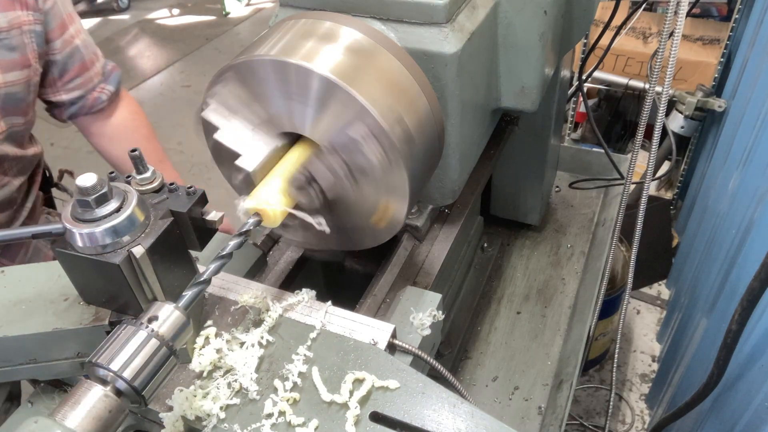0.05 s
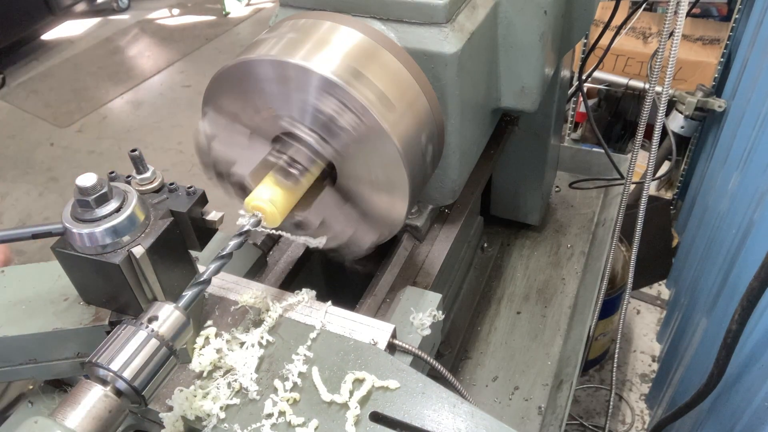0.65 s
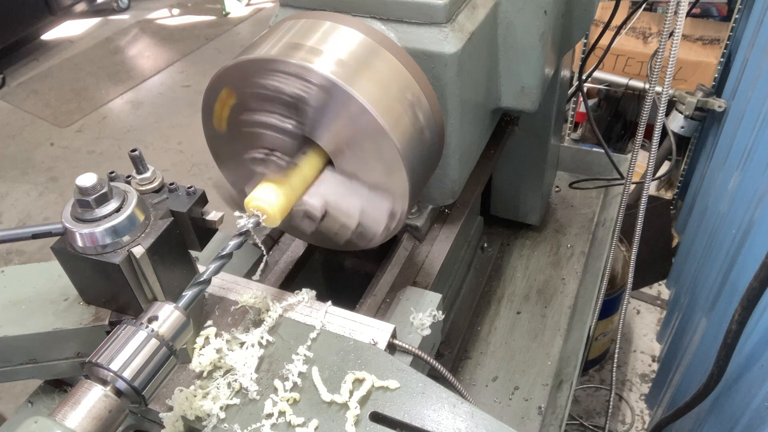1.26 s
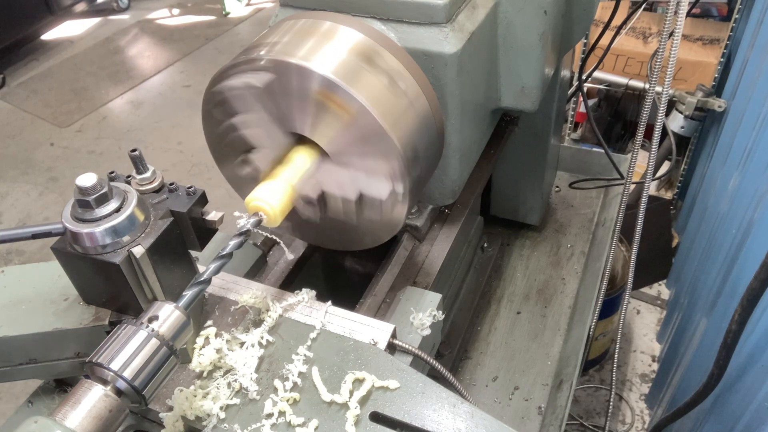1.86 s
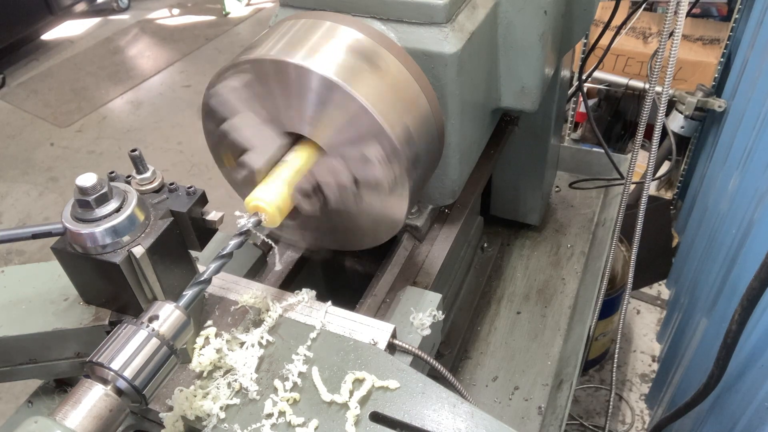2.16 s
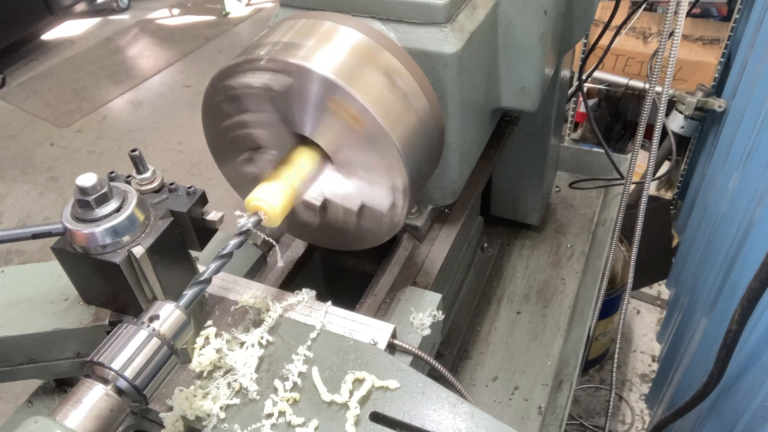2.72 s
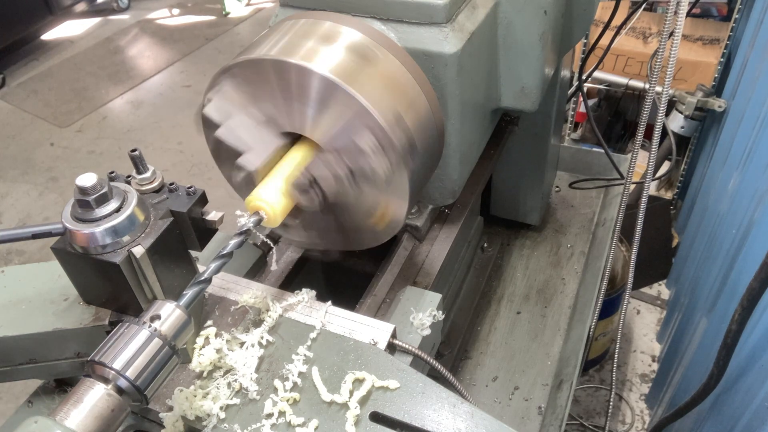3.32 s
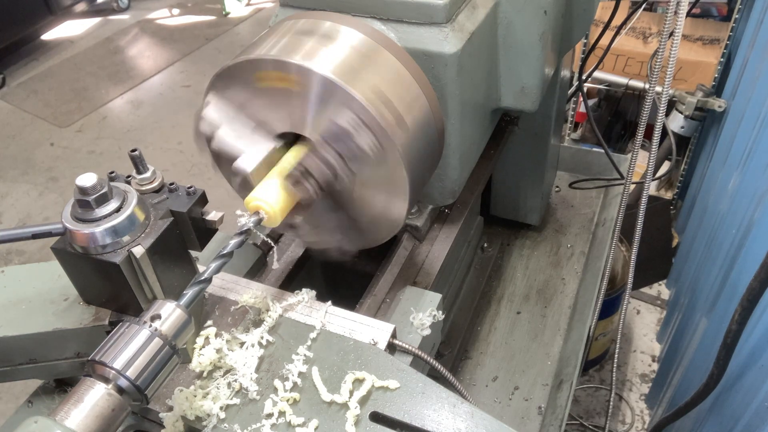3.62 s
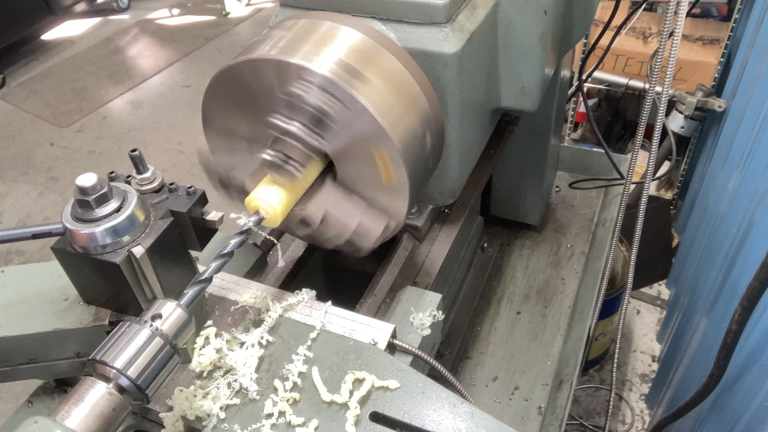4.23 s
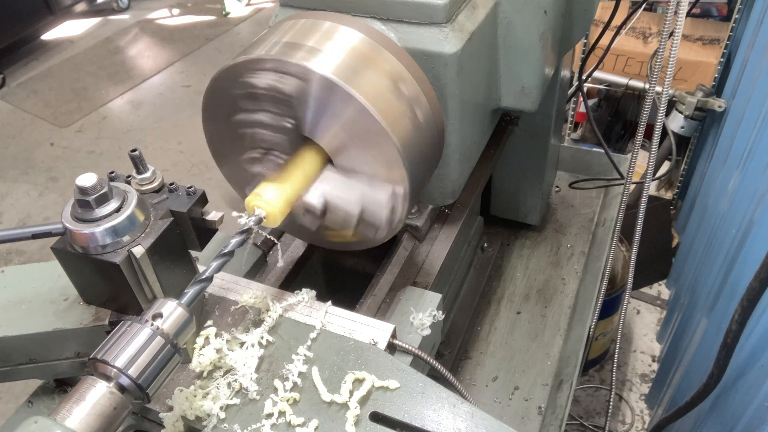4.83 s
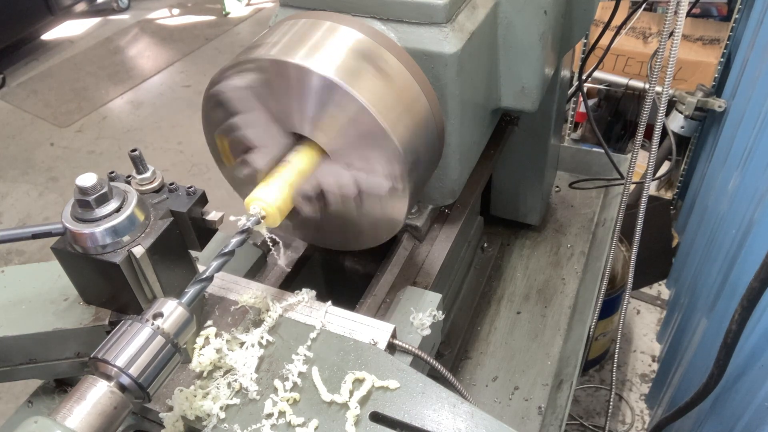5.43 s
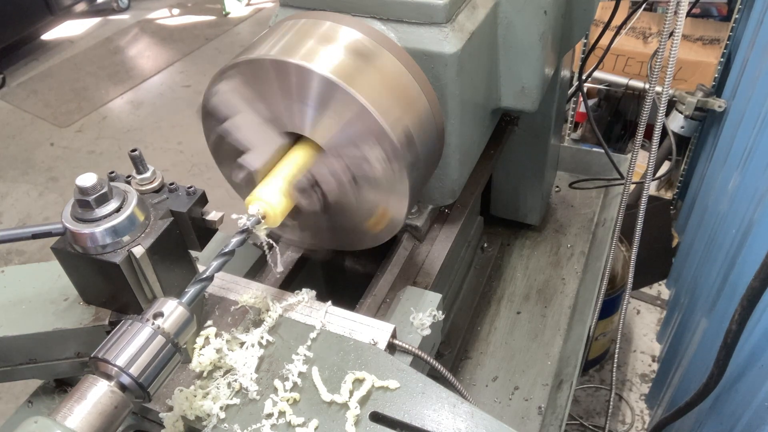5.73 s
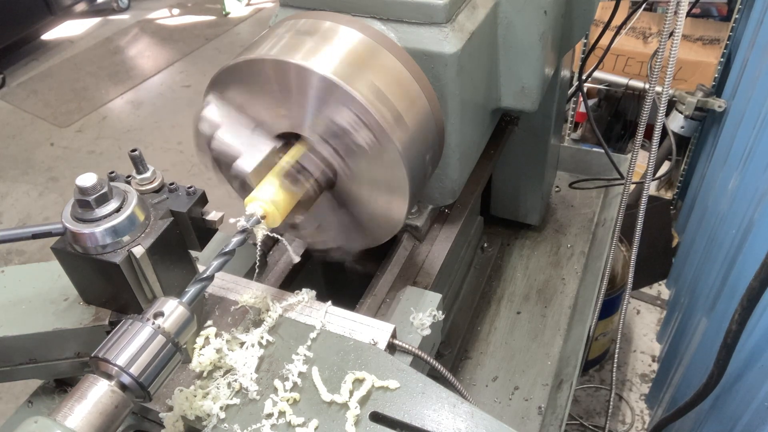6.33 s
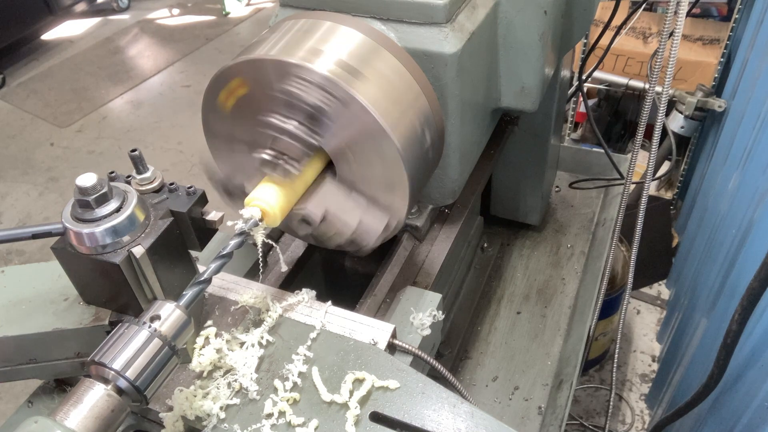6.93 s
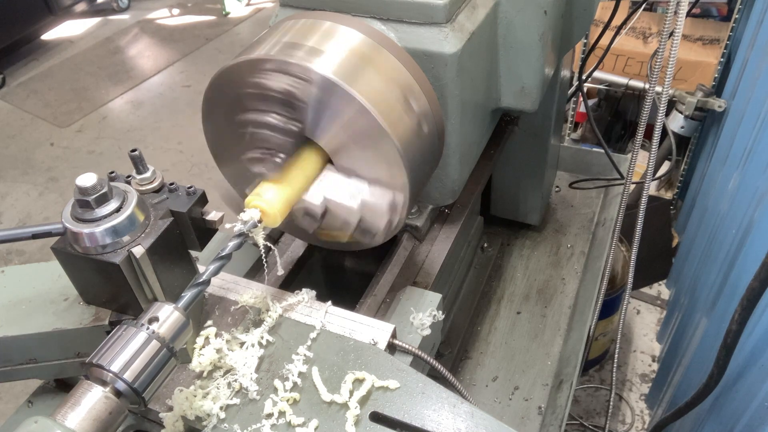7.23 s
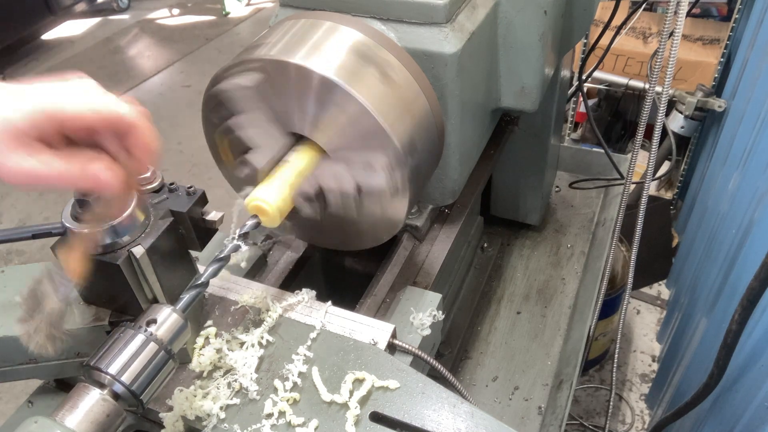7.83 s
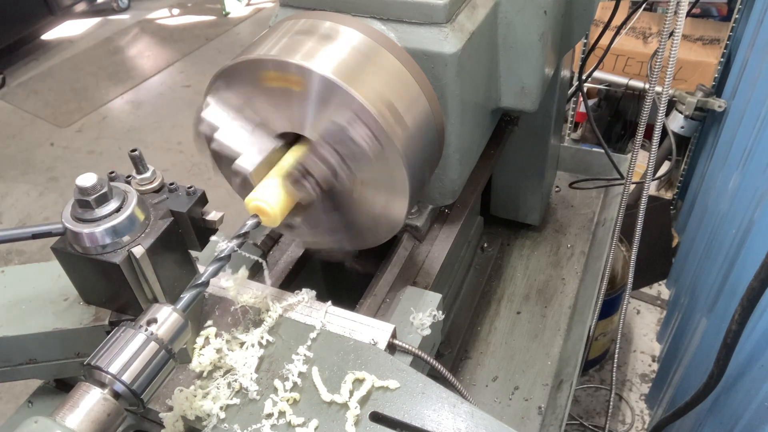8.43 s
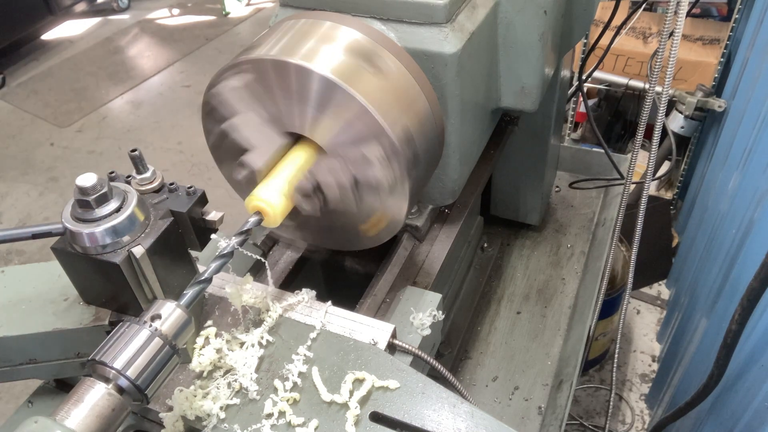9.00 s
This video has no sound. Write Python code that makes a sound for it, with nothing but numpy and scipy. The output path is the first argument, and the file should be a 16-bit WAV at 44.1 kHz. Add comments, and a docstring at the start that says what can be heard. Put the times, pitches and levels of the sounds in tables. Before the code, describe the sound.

A metal lathe runs steadily with a low, even hum and whirring gears while a drill rubs softly into spinning plastic.

```python
"""Drilling plastic on a metal lathe

A lathe runs steadily in a workshop while a twist drill bores the spinning plastic bar. The motor hums
at multiples of the mains frequency. Sliding gear teeth whir and excite the headstock's resonances,
swelling once in each turn of the slow wheel, while a shaft turning four times as fast alternates
bright rings. Friction at the drill hisses softly, and the swarf scrapes now and then."""
import sys
import numpy as np
from scipy import signal
from scipy.fft import rfft, irfft
from scipy.io import wavfile
from scipy.ndimage import uniform_filter1d

SR = 44100
rng = np.random.default_rng(int(sys.argv[2]) if len(sys.argv) > 2 else 0)


def transcribe(signal):
    """Save signal, clipped to [-1, 1], as a 16-bit WAV file at the path in sys.argv[1]."""
    frames = np.atleast_2d(signal).T
    limited = np.clip(frames, -1, 1)
    pcm = np.round(limited * 32767).astype(np.int16)
    wavfile.write(sys.argv[1], SR, pcm)


N = 403956
T = np.arange(N) / SR
FREQ = np.fft.rfftfreq(N, 1 / SR)
WHEEL_HZ = 2.286  # rotation rate of the slow wheel


def gain_of(db):
    """Amplitude ratio of a level in decibels."""
    return 10 ** (np.asarray(db) / 20)


def unit_rms(x):
    """Normalisation to a mean power of 1."""
    return x / np.sqrt(np.mean(abs(x) ** 2) + 1e-20)


def over_pitch(rows):
    """Interpolation of (frequency_hz, value) rows on a logarithmic frequency axis."""
    hz, value = np.transpose(rows)
    return np.interp(np.log(FREQ + 1), np.log(hz + 1), value)


def drift(rate_hz):
    """Random modulation of rms 1, linear between values drawn at the given rate."""
    knots = rng.standard_normal(6000)
    return unit_rms(np.interp(T * rate_hz, np.arange(len(knots)), knots))


def hump(offset, width):
    """Gaussian pulse of height 1 around offset 0."""
    return np.exp(-(offset / width) ** 2)


def accents(rows, half_length_s=0.13):
    """Level modulation in dB for the turns that stand out."""
    return sum(db * hump(T - crest_s, half_length_s) for crest_s, db in rows)


def tone(cycles, db, phase):
    """A sinusoid of given rms level with an interaural phase difference."""
    return np.sqrt(2) * gain_of(db) * np.sin(2 * np.pi * (cycles + rng.random()) - np.array([[0], [phase]]))


def stereo_noise(spectrum):
    """Partially coherent noise: the ratio of mid to side power sets how alike the ears are."""
    # interaural coherence: frequency_hz, coherence
    likeness = [(60, 0.63), (150, 1), (330, 0.91), (450, 0.7), (630, 0.077), (1240, 0.66), (1800, -0.29),
                (3400, 0.6), (4700, -0.28)]
    coherence = over_pitch(likeness)
    mid, side = rfft(rng.standard_normal((2, N))) * np.sqrt([1 + coherence, 1 - coherence])
    return unit_rms(irfft(np.array([mid + side, mid - side]) * gain_of(over_pitch(spectrum)), N))


def resonate(force, hz, width_hz, phase, wander_hz=0):
    """Forced resonance: friction noise drives a double pole, heard with an interaural phase difference."""
    pole = np.exp((-np.pi * width_hz + 2j * np.pi * hz) / SR)
    ring = signal.lfilter([1], [1, -2 * pole, pole ** 2], force * rng.standard_normal(len(force)))
    if wander_hz:
        ring = ring * np.exp(2j * np.pi * np.cumsum(wander_hz * drift(30)[:len(force)]) / SR)
    return np.array([ring.real, (ring * np.exp(-1j * phase)).real])


def sustained(ring, force, firmness=0.45, span_s=0.029):
    """Steady contact feeds a resonance, drawing its envelope towards that of the driving force."""
    window = int(span_s * SR) + 1
    force_level, ring_level = (unit_rms(np.sqrt(abs(uniform_filter1d(power, window))))
                               for power in (force ** 2, (ring ** 2).mean(0)))
    return unit_rms(ring * ((force_level + 0.01) / (ring_level + 0.01)) ** firmness)


def tooth_ripple(count, depth_db):
    """Amplitude modulation at the meshing frequency: tooth count times the wheel's rotation rate."""
    return gain_of(depth_db * np.cos(2 * np.pi * count * WHEEL_HZ * T))


def wheel_load(swing_db, crest_turns, slack_db, slack_turns=0.28):
    """Eccentricity: the wheel's load in dB swings once a turn and dips where the teeth go slack."""
    turns = T * WHEEL_HZ
    slack = hump((turns - slack_turns + 0.5) % 1 - 0.5, width=0.11)
    load_db = swing_db * np.cos(2 * np.pi * (turns - crest_turns)) + slack_db * slack
    return load_db - load_db.mean()


def workshop(x, wet=0.5, t60_s=0.16, echoes_per_s=2000):
    """Reverberation: reflections from bed, wall and floor decay exponentially, different at each ear."""
    age = np.arange(SR // 5) / SR
    shape = (2, len(age))
    echoes = rng.standard_normal(shape) * (rng.random(shape) < echoes_per_s / SR) * (age > 0.002)
    echoes *= np.exp(-np.log(1000) * age / t60_s)
    echoes /= np.linalg.norm(echoes, axis=1, keepdims=True)
    return (x + wet * signal.oaconvolve(x, echoes, axes=1)[:, :N]) / np.hypot(1, wet)


def from_chuck(force, spectrum, left_lag_s=0.000249):
    """Direct and diffuse fields: friction noise reaches the left ear late, amid scattered sound."""
    # direct part of the sound: frequency_hz, power_share
    direct_shares = [(5500, .15), (7000, 0.57), (8200, 0.92), (12000, 1)]
    share = over_pitch(direct_shares)
    friction = rfft(force * rng.standard_normal((3, N))) * unit_rms(gain_of(over_pitch(spectrum)))
    delay = np.exp(-2j * np.pi * FREQ * np.array([[left_lag_s], [0]]))
    direct = np.sqrt(share) * delay * friction[0]
    diffuse = np.sqrt(1 - share) * friction[1:]
    return irfft(direct + diffuse, N)


def hiss(level_db=-53.5, flicker_db=1.9, ceiling_db=1.0):
    """Amplitude-modulated noise: the machine's fine hiss dips irregularly as three flutters combine."""
    # hiss spectrum: frequency_hz, relative_db
    spectrum = [(2500, -11), (5000, 8), (7000, 8), (8000, 1.5), (9300, 3), (10500, -4.5), (12500, -10.5),
                (15500, -28.5)]
    # periodic flutters: rate_hz, relative_depth, crest_s
    flutters = [(11.2, 1.1, .072), (13.06, 1.2, .042), (16.98, 1.3, .057)]
    flutter_db = 1.5 * sum(depth * np.cos(2 * np.pi * hz * (T - crest_s)) for hz, depth, crest_s in flutters)
    force = gain_of(level_db + np.minimum(flutter_db, ceiling_db) + flicker_db * drift(40))
    return from_chuck(force, spectrum)


def thin_ring(level_db=-63, swell_db=3):
    """A narrow, very high metallic resonance comes and goes as its excitation varies."""
    force = gain_of(swell_db * drift(24))
    return gain_of(level_db) * unit_rms(resonate(force, hz=9845, width_hz=90, phase=3.05))


def stand(pitch_hz=160, wander_hz=3, rest_db=-40, uneven_db=3, swell_s=0.032):
    """One loose low resonance of the stand drones unevenly and now and then swells."""
    # brief swells of the drone: crest_s, level_db
    swells = [(.63, -28.5), (2.37, -29), (3.78, -28), (4.8, -28), (5.08, -27), (6.53, -26), (7.02, -24.5),
              (8.45, -30)]
    cycles = np.cumsum(pitch_hz + wander_hz * drift(20)) / SR
    level = gain_of(rest_db + uneven_db * drift(14))
    for crest_s, db in swells:
        level += (gain_of(db) - level) * hump(T - crest_s, swell_s)
    return np.sqrt(2) * level * np.sin(2 * np.pi * cycles)


def knocks():
    """Transients: each is friction noise in one resonance, rising fast and decaying exponentially."""
    # ticks and dull knocks: start_s, level_db, pitch_hz, width_hz, decay_s
    events = [(.005, -27.5, 282, 160, 0.039), (.468, -40, 3100, 1300, .003),
              (3.953, -36.5, 790, 520, 0.005), (6.748, -37, 2660, 1200, .0022)]
    out = np.zeros((2, N))
    age = np.arange(SR // 3) / SR
    for start_s, db, hz, width_hz, decay_s in events:
        ring = unit_rms(resonate(np.ones(len(age)), hz, width_hz, phase=0.37))
        envelope = age / decay_s * np.exp(1 - age / decay_s)
        start = round(start_s * SR)
        out[:, start:start + len(age)] += gain_of(db) * envelope * ring
    return out


def whines(waver_db=1.3, wander_hz=0.7):
    """Two narrowband tones of the drive waver; the upper leads at first, then the lower takes over."""
    # thin whines: pitch_hz, ear_phase_rad, points of (time_s, level_db)
    partials = [(1045, 1.3, [(0, -65), (1.85, -63), (2.0, -52.5), (3.2, -55), (3.9, -52.5), (6, -52),
                (9.1, -51)]), (1104, 1.2, [(0, -57), (1.55, -55), (1.75, -48), (1.93, -47), (2.05, -56),
                (5.7, -58), (6.05, -55), (9.1, -57)])]
    out = np.zeros((2, N))
    for hz, phase, points in partials:
        cycles = np.cumsum(hz + wander_hz * drift(14)) / SR
        level_db = np.interp(T, *np.transpose(points)) + waver_db * drift(9)
        out += tone(cycles, level_db, phase)
    return out


def drill(contact_s=1.05, idle_db=-63, attack_s=0.2, build_db=4, release_s=0.054):
    """Friction noise of drill on plastic: light rubbing, bites and swarf scrapes add in power."""
    # the drill bites harder: start_s, length_s, full_level_db
    bites = [(1.147, 0.1, -52), (1.75, 0.65, -63), (4.36, 1.93, -54.5), (7.65, 0.15, -53)]
    # swarf scrapes past the drill: crest_s, half_length_s, level_db
    scrapes = [(5.477, .002, -46.5), (5.493, .018, -48), (6.1, .018, -53), (6.2, .018, -51),
               (6.238, .009, -38.5), (6.268, .014, -48), (6.294, .007, -46.5), (6.306, .002, -46)]
    # spectrum of rubbing plastic: frequency_hz, relative_db
    spectrum = [(4000, -19), (6500, -4.5), (7500, -3), (8700, 3), (10200, -3), (12000, -3.5), (13000, -5.5),
                (14200, -13.5), (15500, -10.5)]
    rub_power = gain_of(idle_db) ** 2 * np.clip((T - contact_s) / attack_s, 0, 1)
    for start_s, length_s, db in bites:
        age = T - start_s
        grip = np.clip(age / attack_s, 0, 1) * np.exp(-np.maximum(age - length_s, 0) / release_s)
        bite_db = db - build_db * np.clip(1 - age / length_s, 0, 1)
        rub_power += (grip * gain_of(bite_db)) ** 2
    grain = unit_rms(gain_of(2.2 * drift(300) + 0.8 * drift(25)))  # fine scratches in slower clumps
    scrape_power = sum((gain_of(db) * hump(T - crest_s, half_s)) ** 2 for crest_s, half_s, db in scrapes)
    return from_chuck(np.sqrt(rub_power * grain ** 2 + scrape_power), spectrum)


def mesh(slack_db=-5.5, waver_db=3):
    """Load modulation: the teeth sing with a restless pitch and fall away as they go slack."""
    # mesh tones: pitch_hz, wander_hz, level_db, swing_db, crest_turns, ear_phase_rad
    partials = [(965, 7, -52, 4, .88, 1.5), (1230, 12, -54.5, 3.5, .85, 1.8), (1399, 23, -50, 4, .78, .1)]
    # turns that sing more or less than usual: crest_s, extra_db
    odd_turns = [(.38, -3), (2.2, -1), (3.86, 1.5), (5.15, -1.5), (6.47, 3.5), (6.94, 2.5), (8.7, 1)]
    out = np.zeros((2, N))
    for hz, wander_hz, db, swing_db, crest_turns, phase in partials:
        cycles = np.cumsum(hz + wander_hz * drift(70)) / SR
        load_db = np.minimum(wheel_load(swing_db, crest_turns, slack_db), swing_db / 2)
        out += tone(cycles, db + accents(odd_turns) + load_db + waver_db * drift(30), phase)
    return out


def fast_shaft(uneven_db=1.14):
    """Friction excites resonances in alternation as the fast shaft rubs on one side, then the other."""
    # bright rings: pitch_hz, width_hz, level_db, swing_db, crest_turns, ear_phase_rad
    rings = [(4200, 72, -54, 4.8, 0.8, .4), (4355, 55, -53, 4.8, 0.69, 0.68),
             (4490, 300, -56, -1.5, 1, 0.93), (4638, 48, -53.5, 5.5, 0.18, 0.49),
             (4850, 60, -63, 4, 0.18, 1.1), (4980, 380, -61.5, 5, 0.18, 1.1)]
    # turns of harder rubbing: crest_s, extra_db
    hard_rubs = [(2.52, 2.5), (2.9, 2), (3.36, 3), (4.3, 2.5), (6.98, 2.5), (7.33, 3)]
    load_db = wheel_load(swing_db=0.5, crest_turns=0.64, slack_db=-7)
    force = gain_of(load_db + uneven_db * drift(20) + accents(hard_rubs))
    force *= tooth_ripple(60, depth_db=5) * tooth_ripple(120, depth_db=4)  # each tooth meets sharply
    shaft_turns = 4 * WHEEL_HZ * T
    out = np.zeros((2, N))
    for hz, width_hz, db, swing_db, crest_turns, phase in rings:
        rub = force * gain_of(swing_db * np.cos(2 * np.pi * (shaft_turns - crest_turns)))
        ring = resonate(rub, hz, width_hz, phase, wander_hz=14)
        out += gain_of(db) * sustained(ring, rub)
    return out


def gears(whir_db=-34.5, crossover_hz=400):
    """Sliding friction of the teeth radiates a broad whir and drives the modes of the headstock."""
    # whir spectrum: frequency_hz, relative_db
    spectrum = [(20, -34), (45, -19), (80, -3), (130, 3), (250, 0.5), (420, -4), (600, -6), (900, -11),
                (1600, -9.5), (2500, -14.5), (3700, -19), (4700, -21), (5400, -29), (7000, -59.5)]
    # modes of the casting: pitch_hz, width_hz, level_db, load_sensitivity, ear_phase_rad
    modes = [(88.4, 13, -41.5, 0, 0), (108.1, 5.8, -41.5, -1.5, 0.5), (280.5, 29, -38.5, -0.8, 0.5),
             (355, 40, -47.5, -2.5, 0.5), (496.6, 60, -51.5, -1.5, 1.1), (617, 45, -48.5, 1, 1.23),
             (676, 30, -48.5, 0.5, 1), (712, 16, -59, 0.5, 1.5), (771, 17, -53, -0.5, 2),
             (830, 15, -55.5, 4, 1), (872, 32, -57.5, 3.5, -0.6), (964, 55, -50, 1.5, 0.95),
             (1080, 72, -53, -2.5, 1.5), (1228, 73, -50, 0.7, 2), (1410, 110, -49.5, 2.5, 0),
             (1515, 100, -51, 0.5, 1.45), (1636, 79, -51, 0.3, 1.3), (1753, 89, -58.5, 3.5, 3),
             (1862, 59, -51.5, 3, 1.5), (2040, 35, -58, 1, 1), (2130, 78, -52.5, 4, 2.5),
             (2225, 55, -52.5, 3.5, 1), (2366, 60, -58.5, 2.5, 2), (2590, 270, -55, 1, 1.5),
             (2870, 86, -52.5, 3, 1.9), (3067, 71, -55, 1.5, 2), (3356, 210, -59.5, 3, 0.5),
             (3460, 170, -54, 2, 1.5), (3710, 120, -56.5, 0, 3.5), (3950, 240, -57.5, 2, 1.5)]
    load_db = wheel_load(swing_db=0.7, crest_turns=0.97, slack_db=-1.6)
    ripple = tooth_ripple(60, depth_db=1.5)
    whir = gain_of(whir_db + 0.7 * load_db) * stereo_noise(spectrum) * ripple
    bass = irfft(rfft(whir) / (1 + (FREQ / crossover_hz) ** 4), N)
    out = bass + workshop(whir - bass)  # the bass arrives directly, the rest with reflections
    mode_ripple = ripple * tooth_ripple(21, depth_db=1.54) * tooth_ripple(42, depth_db=1.54)
    for hz, width_hz, db, sensitivity, phase in modes:
        force = gain_of(sensitivity * load_db) * mode_ripple
        out += gain_of(db) * unit_rms(resonate(force, hz, width_hz, phase))
    return out


def mains_hum(mains_hz=59.942, weak_db=-2.5, settle_s=0.58, throb_db=-20.5, beat_hz=12.2):
    """Magnetic forces hum at mains harmonics; a fading tone just below the second beats against it."""
    # magnetic hum: harmonic_number, level_db
    harmonics = [(1, -50.5), (2, -16.5), (4, -50), (6, -37.5), (8, -50.5), (10, -64.5), (12, -62),
                 (14, -57.5)]
    cycles = mains_hz * T
    hum = sum(gain_of(db) * np.cos(2 * np.pi * number * cycles) for number, db in harmonics)
    hum *= gain_of(weak_db * np.exp(-T / settle_s))  # starts a little weak, then settles
    first_dip_s, hold_s, decay_s = 0.033, 0.1, 0.047
    fade = np.exp(-np.maximum(T - hold_s, 0) / decay_s)
    throb = gain_of(throb_db) * fade * np.cos(2 * np.pi * (2 * cycles - beat_hz * (T - first_dip_s)))
    return np.sqrt(2) * (hum - throb)


def motor(waver_db=1.15, waver_cycles=0.023):
    """Superposition: weaker shaft and gear tones beat against the steady mains hum."""
    # shaft and gear tones: pitch_hz, level_db, ear_phase_rad
    partials = [(53.5, -59.5, 0.099), (62.2, -54.5, 0.24), (77, -54.5, 0), (87.6, -47.5, 0.22),
                (88.5, -53, 0.079), (103, -40.5, 0.35), (107, -47.5, 0), (107.7, -47, 0.31),
                (111.2, -44.5, 0.039), (136, -49, 0), (150.3, -44, 0.027), (269.4, -49.5, 0),
                (344, -59.5, 0.12), (377, -50.5, 0.045), (393.3, -52.5, 0.16), (451, -57, 0.44),
                (489.3, -54.5, 0.68), (498, -54.5, 1), (511, -52.5, 1.1), (655, -58, 0.82),
                (832, -59, 0.94), (922, -60.5, 0.072)]
    out = np.ones((2, 1)) * mains_hum()
    for hz, db, phase in partials:
        unsteady = np.sqrt(hz / 300)  # uneven speed disturbs the high tones most
        cycles = hz * T + waver_cycles * unsteady * drift(5)
        out += tone(cycles, db + waver_db * unsteady * drift(6), phase)
    return out


def scene():
    """The sound pressures of all parts of the lathe add linearly."""
    machine = motor() + stand() + gears() + mesh() + whines() + fast_shaft() + hiss() + thin_ring()
    return machine + drill() + knocks()


def record(dry, cutoff_hz=15700):
    """An interaural level difference puts the bass to the right; a low-pass filter limits the band."""
    # balance between the ears: frequency_hz, left_minus_right_db
    balance = [(120, -1.92), (300, -0.6), (550, -3.0), (1200, 0.5), (2500, 1.7), (4500, -0.7), (8000, 0)]
    balance_db = over_pitch(balance)
    heard = irfft(rfft(dry) * gain_of(np.array([balance_db, -balance_db]) / 2), N)
    low_pass = signal.firwin(511, cutoff_hz, window=("kaiser", 9), fs=SR)
    return signal.oaconvolve(heard, low_pass[None], "same")


dry = scene()
out = record(dry)
transcribe(out)
```